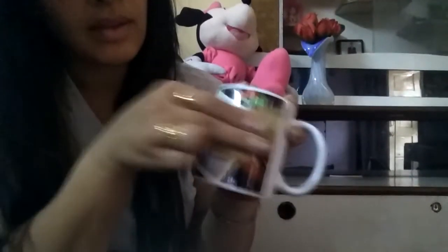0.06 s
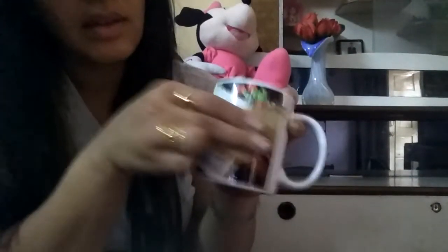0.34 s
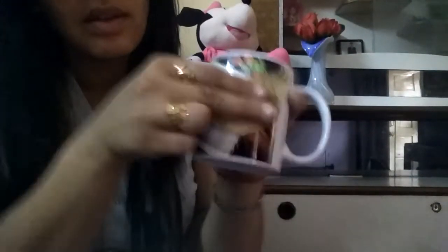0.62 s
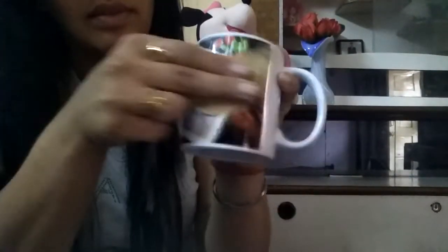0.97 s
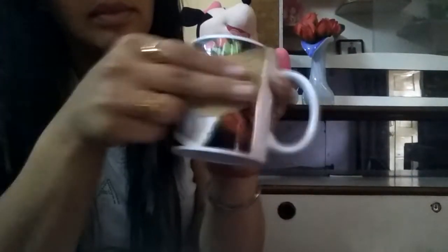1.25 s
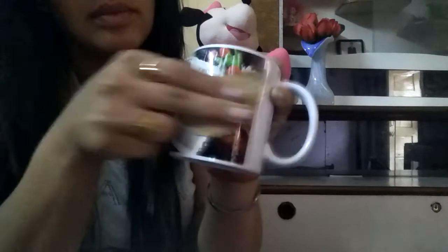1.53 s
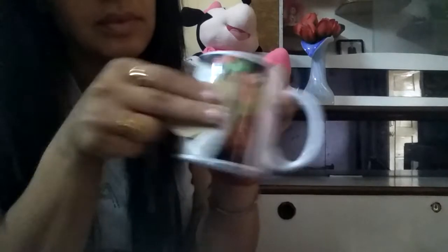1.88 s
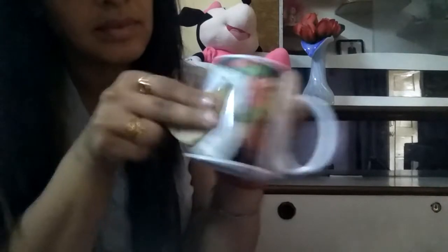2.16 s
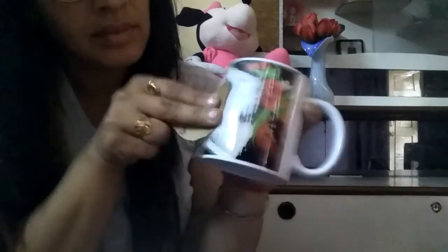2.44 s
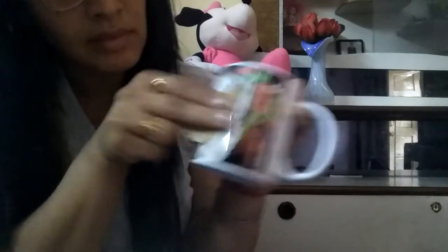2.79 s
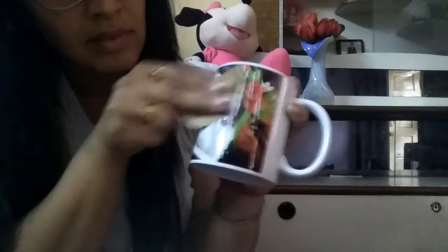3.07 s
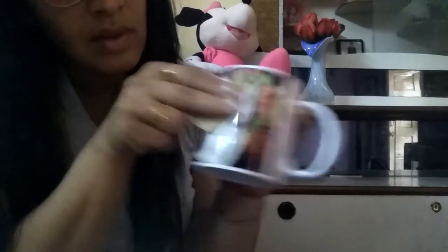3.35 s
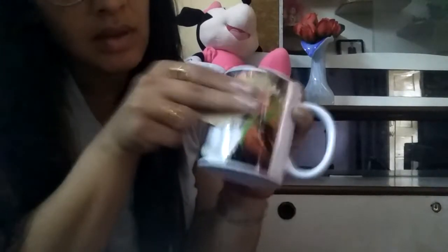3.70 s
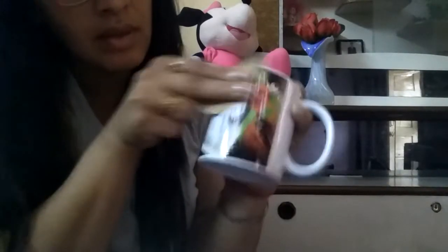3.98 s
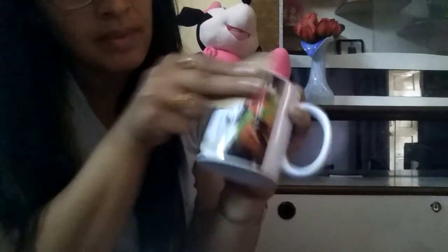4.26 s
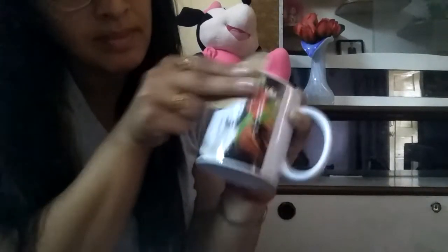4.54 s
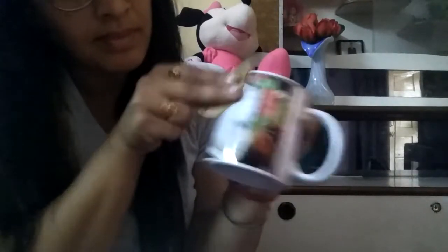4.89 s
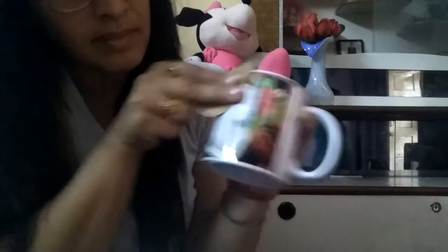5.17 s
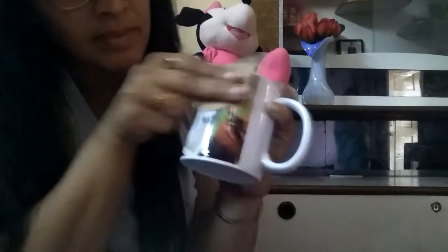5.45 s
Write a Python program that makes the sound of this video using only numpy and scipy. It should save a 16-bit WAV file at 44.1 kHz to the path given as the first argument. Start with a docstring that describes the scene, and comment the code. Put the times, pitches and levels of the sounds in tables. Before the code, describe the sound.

Sandpaper rubs quickly to and fro over a glazed mug, a bright, gritty hiss in short strokes, close by in a small room.

```python
"""A bright, gritty hiss comes in strokes, about seven a second: sandpaper rubbed to and fro over a glazed
mug, close by in a small room. A push drags lightly, then bites; the pull back is softer and more even.
Friction grows with the force of the stroke, so the force sets how loudly the grit hisses, the paper
buzzes and the hand-damped mug rings. The mug shifts in the grip, a low hum swells and fades,
single grains snap, and paper and fingers scuff."""
import sys
import numpy as np
from scipy import signal
from scipy.fft import rfft, irfft, next_fast_len
from scipy.io import wavfile
from scipy.ndimage import map_coordinates

SR = 44100
rng = np.random.default_rng(int(sys.argv[2]) if len(sys.argv) > 2 else 0)


def wav_out(sig):
    """Save sig, one row per channel (or a flat mono array), as 16-bit PCM at SR to the path in sys.argv[1]."""
    wavfile.write(sys.argv[1], SR, np.round(np.clip(np.atleast_2d(sig).T, -1, 1) * 32767).astype(np.int16))


N = 252693
TIME = np.arange(N) / SR

# strokes, push and pull in turn: start_s, wait_s, bite_s, strength_db, buzz_db, pitch_hz
HAND_STROKES = [(-0.06, 0.059, 0.031, -3.5, 4, 3490), (0.113, 0.037, 0.068, -11.5, 1.5, 3500),
                (0.267, 0.037, 0.04, -5.5, 4, 3370), (0.403, 0.032, 0.071, -7, -1.5, 3230),
                (0.555, 0.057, 0.031, -1.5, 3.5, 4000), (0.701, 0.033, 0.058, -7.5, -4.5, 3760),
                (0.856, 0.051, 0.041, -2.5, 3, 3770), (1.007, 0.037, 0.098, -7.5, -3, 3620),
                (1.154, 0.037, 0.052, 0.0, 0, 3930), (1.279, 0.046, 0.052, -4.5, -2, 3930),
                (1.429, 0.036, 0.043, -1, 0, 3950), (1.57, 0.014, 0.12, -21, 2.5, 3740),
                (1.753, 0.034, 0.047, -6, 3.5, 3900), (1.879, 0.041, 0.047, -3.5, -6.5, 3650),
                (2.028, 0.064, 0.024, -2, 0, 3680), (2.151, 0.045, 0.022, -1.5, -9, 3670),
                (2.279, 0.072, 0.02, -3.5, 2.5, 3740), (2.391, 0.014, 0.065, -13.5, -3, 3660),
                (2.527, 0.081, 0.023, -7.5, 1, 3700), (2.67, 0.048, 0.02, -14.5, 1, 3450),
                (2.794, 0.073, 0.025, -4.5, 4, 3850), (2.956, 0.029, 0.15, -18, 2, 3280),
                (3.11, 0.031, 0.049, -8, 5, 3580), (3.218, 0.049, 0.015, -1, -3, 4130),
                (3.348, 0.045, 0.048, -2.5, 2.5, 3700), (3.466, 0.014, 0.093, -11, -0.5, 4000),
                (3.602, 0.056, 0.049, -2.0, -3.5, 3530), (3.732, 0.07, 0.0067, 0.5, -6, 3450),
                (3.856, 0.075, 0.017, 4, 0, 3940), (3.993, 0.0052, 0.14, -20.0, 2.5, 3430),
                (4.154, 0.061, 0.042, -0.5, 0.5, 4050), (4.293, 0.017, 0.09, -10, -4.5, 3680),
                (4.433, 0.072, 0.028, 0.5, 4, 3390), (4.573, 0.01, 0.079, -14, -1.5, 3690),
                (4.719, 0.064, 0.03, -0.5, 6, 3800), (4.846, 0.023, 0.062, -9.0, -2.5, 3680),
                (4.997, 0.061, 0.049, -1.5, 3.5, 4160), (5.142, 0.014, 0.061, -7.5, -3, 4100),
                (5.281, 0.055, 0.034, 5, 4, 3810), (5.415, 0.022, 0.075, -16, 3, 4660),
                (5.599, 0.087, 0.022, -18, 8, 3850)]
# spectra of the rubbing, from highest to lowest: frequency_hz, gain_db
HISS_SPECTRUM = [(9000, -49), (11500, -39.5), (12150, 0.5), (13200, 4.5), (14300, 5.5), (15800, -4)]
SWISH_SPECTRUM = [(8000, -51), (9800, -7), (11000, 0.5), (12000, 3.5), (12800, -0.5), (14500, -12)]
SCRAPE_SPECTRUM = [(3800, -40), (5100, -2), (5900, -3.5), (7500, 0.5), (9300, 2.5), (10200, -11),
                   (12500, -24)]
BUZZ_SPECTRUM = [(1000, -40), (2500, -0.5), (3200, 5.5), (4400, 2.0), (5600, -7.0), (9000, -12)]
RASP_SPECTRUM = [(350, -13.5), (600, -8.5), (1000, -5), (1600, -6.5), (2200, 2.5), (2800, -3.5),
                 (4000, -24), (6000, -7)]
# slow trends of the rubbing; the rasp peaks while the paper works at the rim: time_s, gain_db
SWISH_TREND = [(0, 5), (1.2, 3.5), (2.4, -1), (2.9, -0.5), (3.15, -13), (3.4, 0.5), (3.7, -9), (4.3, -18),
               (4.6, -15), (4.8, 3), (4.92, -8), (5.08, 3.5), (5.2, 2), (5.35, -1), (5.7, -2)]
SCRAPE_TREND = [(0, 5.5), (1.2, 2), (2.4, 0.5), (2.9, 0.5), (3.15, -6), (3.4, -1.5), (3.8, -11.5),
                (4.25, 0), (4.6, 2), (5.35, -0.5), (5.7, -1)]
RASP_TREND = [(0, 0.5), (1.5, -1.5), (2.4, 4.5), (3.9, 1), (4.25, 7), (4.5, 10), (4.8, 10.5), (5.35, 4),
              (5.7, -11)]
# modes of the held mug: pitch_hz, width_hz, gain_db
MUG_MODES = [(721.6, 3.6, -6), (852, 18, 1), (1648, 200, -3), (2078, 220, -2), (2358, 127, -2),
             (3667, 20, 3), (5040, 150, -0.5), (5226, 59, 0.5)]
# envelopes of the mug shifting in the grip and of the hum: time_s, level_db
GRIP_ENVELOPE = [(0, -61), (.25, -58), (.55, -62), (.8, -59.5), (1.0, -61.5), (1.8, -66), (2.35, -63),
                 (2.7, -64), (3.2, -61), (3.45, -63), (3.67, -57), (3.85, -62), (4.8, -58), (5.05, -59),
                 (5.35, -61), (5.62, -73), (5.73, -55)]
HUM_ENVELOPE = [(0.0, -81), (0.16, -66), (0.29, -77), (0.46, -59), (0.65, -79), (0.88, -62), (1.8, -64.5),
                (1.93, -73), (3.35, -67), (3.81, -70), (3.85, -79), (3.94, -54.5), (4.05, -59.5),
                (4.1, -70), (4.44, -60.5), (4.47, -71), (4.6, -72), (4.64, -60.5), (5.09, -53), (5.41, -80),
                (5.49, -65), (5.73, -89)]
# spectra of the grip, the rumble and the steady room noise: frequency_hz, gain_db
GRIP_SPECTRUM = [(100, -19), (210, -19), (290, 1.5), (340, -6.5), (410, 1), (560, -15), (730, -0.5),
                 (1000, -1), (1400, -3), (2200, -26), (4000, -25.5)]
RUMBLE_SPECTRUM = [(25, -13), (55, -11), (80, 5.5), (120, -6.5), (200, -16), (500, -58), (2000, -76)]
AMBIENT_SPECTRUM = [(20, -18), (60, 8), (120, 5.5), (200, 1.5), (400, 0), (850, 1.5), (1600, 0.5),
                    (3000, -9.5), (8000, -24), (16000, -12)]
# reverberation time of the room: frequency_hz, t60_s
ROOM_DECAY = [(200, 1), (2000, 0.1), (6000, 0.45), (15000, 0.18)]
# coarse grains that catch and snap: start_s, peak_db
GRAIN_SNAPS = [(0.0947, -39), (0.5074, -31), (0.625, -26), (0.6284, -23), (1.1982, -9.5), (1.9974, -26),
               (2.1994, -10), (2.2374, -20), (2.6105, -14), (3.294, -8.5), (3.3972, -12), (3.5299, -20)]
# scuffs of paper and fingers, hollow or gritty: middle_s, length_s, pitch_hz, width_hz, level_db
BRIEF_SCUFFS = [(0.2, 0.079, 296, 70, -62.5), (0.351, 0.073, 393, 130, -63), (0.79, 0.17, 744, 110, -60),
                (1.273, 0.066, 1300, 111, -60), (1.289, 0.081, 292, 50, -64),
                (1.715, 0.067, 3220, 900, -57), (2.319, 0.06, 411, 48.7, -62),
                (2.391, 0.26, 1340, 243, -64.5), (2.77, 0.021, 2250, 795, -52),
                (3.189, 0.11, 410, 202, -65), (3.26, 0.057, 4080, 900, -48),
                (3.629, 0.068, 2200, 1000, -57), (3.677, 0.055, 438, 90, -61), (3.7, 0.043, 3790, 890, -43),
                (3.77, 0.053, 3540, 900, -53.5), (3.956, .022, 3870, 800, -45.5),
                (4.124, 0.04, 2230, 1680, -52.5), (4.224, 0.074, 1710, 300, -51),
                (4.418, 0.041, 2230, 614, -54), (4.469, 0.069, 2820, 2000, -48.5),
                (4.516, 0.078, 707, 158, -53.5), (4.537, 0.018, 3630, 1000, -43),
                (4.776, 0.076, 1710, 67.7, -52.5), (4.811, .025, 3570, 1100, -42),
                (4.82, 0.15, 873, 170, -57), (5.022, 0.13, 313, 80, -63), (5.065, 0.084, 747, 164, -57.5)]


def amp(db):
    """Amplitude ratio: tenfold for every 20 dB."""
    return 10 ** (np.asarray(db) / 20)


def unit(x):
    """Normalisation to rms 1."""
    return x / np.sqrt(np.mean(x ** 2) + 1e-20)


def level(curve):
    """Amplitude envelope, interpolated in decibels from rows of time_s, level_db."""
    return amp(np.interp(TIME, *np.transpose(curve)))


def read(points, hz):
    """Interpolation on a logarithmic frequency axis."""
    f, value = np.transpose(points)
    return np.interp(np.log(hz + 1), np.log(f + 1), value)


def add(mix, start_s, sound):
    """Superposition: a sound sums into the mix from start_s."""
    part = mix[max(round(start_s * SR), 0):][:len(sound)]
    part += sound[:len(part)]


def colour(x, spectrum):
    """Spectral shaping to rms 1, falling 12 dB an octave below the first point."""
    size = next_fast_len(N)
    hz = np.fft.rfftfreq(size, 1 / SR)
    gain = amp(read(spectrum, hz)) * np.minimum(hz / spectrum[0][0], 1) ** 2
    return unit(irfft(rfft(x, size) * gain, size)[:N])


def wander(rate_hz):
    """Random modulation of rms 1, gliding to a new value rate_hz times a second."""
    return unit(np.interp(TIME * rate_hz, np.arange(N), rng.standard_normal(N)))


def resonate(x, hz, width_hz):
    """Forced resonance: a damped oscillator of gain 1 whose natural frequency may move."""
    phasor = np.exp(2j * np.pi * np.cumsum(hz * np.ones(N)) / SR)
    pole = np.exp(-np.pi * width_hz / SR)
    return 2 * (phasor * signal.lfilter([1 - pole], [1, -pole], x / phasor + 1e-18)).real


def strokes():
    """Reciprocating motion, per sample: pulling or not, time into the stroke, its duration, its row."""
    starts, *columns = np.transpose(HAND_STROKES)
    k = np.maximum(np.searchsorted(starts, TIME) - 1, 0)
    duration = np.diff(starts, append=5.76)
    return k % 2 == 1, TIME - starts[k], duration[k], *(column[k] for column in columns)


def force(lag_s):
    """Sliding friction: a light drag that grows with speed, plus one bite a stroke."""
    pulling, t, duration, wait_s, bite_s, strength_db, *_ = strokes()
    speed = abs(np.sin(np.pi * t / duration))
    drag = amp(np.where(pulling, -10, -20.5)) * speed ** 0.77
    rise_s, fall_s = 0.004 + 0.066 * bite_s, 0.0055 + 0.066 * bite_s  # longer bites have gentler edges
    grips = (1 + np.tanh((t - lag_s - wait_s) / (2 * rise_s))) / 2
    holds = (1 + np.tanh((wait_s + bite_s + lag_s - t) / (2 * fall_s))) / 2
    turn_dip = np.tanh(0.99 + 4 * speed)  # friction eases where the hand turns
    pressed = amp(strength_db) * (drag + grips * holds) * turn_dip
    limit = amp(2.5)  # however hard the hand presses, the grit bites no deeper
    return limit * np.tanh(pressed / limit)


def friction(push_db, pull_db, exponent, lag_s=0.):
    """Power law: friction noise grows as a power of the force, with a gain for each direction."""
    pulling, *_ = strokes()
    return amp(np.where(pulling, pull_db, push_db)) * force(lag_s) ** exponent


def judder(rate_hz, depth_db):
    """Stick-slip: uneven contact modulates the amplitude at random."""
    return unit(amp(depth_db * 2 * np.tanh(wander(rate_hz) / 2)))


def grit(per_s, spread_db, share):
    """Shot noise: separate grain impacts carry a share of the power, countless fine ones the rest."""
    size = amp(spread_db * np.minimum(rng.exponential(1, N), 3.2))
    impacts = size * rng.choice([-1, 1], N) * (rng.random(N) < per_s / SR)
    return np.sqrt(share) * unit(impacts) + np.sqrt(1 - share) * rng.standard_normal(N)


def shifting_gap(x, depth_db, width_hz, span_s):
    """Time-varying filter: as the gap at the glaze changes shape, narrow peaks and hollows come and go."""
    hz, t, spectra = signal.stft(x, SR, nperseg=512, noverlap=384)
    where = np.meshgrid(hz / width_hz, t / span_s, indexing="ij")
    patches = map_coordinates(rng.standard_normal((400, 400)), where, order=1, mode="wrap")
    spectra *= amp(depth_db * unit(patches))
    return unit(signal.istft(spectra, SR, nperseg=512, noverlap=384)[1][:N])


def grit_hiss():
    """Friction noise: one stream of fine grains on glaze excites a hiss, a swish and a scrape."""
    fine = grit(per_s=3000, spread_db=0, share=0.24)
    fine = shifting_gap(fine, depth_db=2.5, width_hz=443, span_s=0.049)
    hiss = colour(fine, HISS_SPECTRUM) * friction(push_db=-21.5, pull_db=-22.5, exponent=1.2)
    swish = colour(fine, SWISH_SPECTRUM) * friction(push_db=-32, pull_db=-35, exponent=1.03, lag_s=0.001)
    scrape = colour(fine, SCRAPE_SPECTRUM)
    scrape *= friction(push_db=-44, pull_db=-46.5, exponent=0.89, lag_s=0.01)
    return hiss + swish * level(SWISH_TREND) + scrape * level(SCRAPE_TREND)


def paper_buzz():
    """Gliding resonance: the paper under the fingers rises in pitch on a push and falls on a pull."""
    pulling, t, _, wait_s, bite_s, _, buzz_db, pitch_hz = strokes()
    glide_hz_per_s = np.where(pulling, -5000, 8100)
    hz = (pitch_hz + glide_hz_per_s * (t - wait_s - bite_s / 2)) * (1 + 0.025 * wander(rate_hz=30))
    grains = grit(per_s=3000, spread_db=2.5, share=0.55)
    buzz = resonate(resonate(grains, hz, width_hz=1500), hz, width_hz=1560)
    buzz = shifting_gap(colour(buzz, BUZZ_SPECTRUM), depth_db=2.9, width_hz=170, span_s=0.045)
    # just before a push lets go, the paper catches and buzzes harder
    catch_s = wait_s + bite_s - 0.0032
    catch_db = np.where(pulling, 0, 3.5 * np.exp(-((t - catch_s) / 0.0046) ** 2))
    drive = friction(push_db=-44, pull_db=-44, exponent=0.96, lag_s=-0.00081)
    return buzz * amp(buzz_db + catch_db) * drive * judder(rate_hz=180, depth_db=1.5)


def coarse_rasp():
    """Impact noise: sparser, uneven grains rasp in the midrange, more so in strokes that buzz harder."""
    *_, buzz_db, _ = strokes()
    grains = colour(grit(per_s=1200, spread_db=6, share=0.31), RASP_SPECTRUM)
    rasp = shifting_gap(grains, depth_db=6, width_hz=182.3, span_s=0.05)
    drive = friction(push_db=-56.5, pull_db=-60.5, exponent=0.7, lag_s=-0.0095)
    return rasp * drive * level(RASP_TREND) * amp(0.75 * buzz_db)


def mug_ring():
    """Modal vibration: coarse grains drive the modes of the hand-damped mug."""
    drive = friction(push_db=0.5, pull_db=-2, exponent=0.64) * level(RASP_TREND) ** 0.82
    blows = grit(per_s=1500, spread_db=1.5, share=0.26) * drive
    return unit(sum(amp(db) * resonate(blows, hz, width_hz) for hz, width_hz, db in MUG_MODES))


def grip_creep():
    """Frictional creep: fingers slip on the mug in soft, dull grains."""
    slips = colour(grit(per_s=250, spread_db=1, share=0.55), GRIP_SPECTRUM)
    return level(GRIP_ENVELOPE) * shifting_gap(slips, depth_db=4, width_hz=120.5, span_s=0.07)


def low_hum():
    """Modulation: a low tone wavers in frequency, and swells and fades with the rumble around it."""
    pitch_hz = 78 + 1.714 * wander(rate_hz=7.7)
    tone = np.sqrt(2) * np.sin(2 * np.pi * np.cumsum(pitch_hz) / SR)
    rumble = colour(rng.standard_normal(N), RUMBLE_SPECTRUM)
    return level(HUM_ENVELOPE) * (amp(-1.2) * tone + amp(-5) * rumble)


def room_echo(x):
    """Reverberation: sparse reflections of random sign decay exponentially, the bass lasting longest."""
    taps = rng.choice([-1., 1.], SR // 2) * (rng.random(SR // 2) < 3000 / SR)
    taps[:130] = 0  # no reflection arrives in the first 3 ms
    hz, t, spectra = signal.stft(taps, SR, nperseg=256)
    decay = amp(-60 * t / read(ROOM_DECAY, hz)[:, None])
    tail = signal.istft(spectra * decay, SR, nperseg=256)[1]
    return signal.fftconvolve(x, tail / np.linalg.norm(tail))[:N]


def grain_snaps(band_hz=(11700, 15300), decay_s=0.0008):
    """Transients: a grain catches and snaps free in a brief burst of high noise."""
    out, t = np.zeros(N), np.arange(1024) / SR
    band = signal.butter(5, band_hz, "band", fs=SR, output="sos")
    for start_s, peak_db in GRAIN_SNAPS:
        burst = signal.sosfilt(band, rng.standard_normal(len(t)) * np.exp(-t / decay_s))
        add(out, start_s, amp(peak_db) * burst / abs(burst).max())
    return out


def scuffs():
    """Resonant filtering: each scuff is a small swell of friction noise in one band."""
    out = np.zeros(N)
    for middle_s, length_s, hz, width_hz, level_db in BRIEF_SCUFFS:
        band = signal.butter(2, [hz - width_hz / 2, hz + width_hz / 2], "band", fs=SR, output="sos")
        swell = np.hanning(round(length_s * SR))
        noise = signal.sosfilt(band, rng.standard_normal(SR // 2))[-len(swell):]
        add(out, middle_s - length_s / 2, amp(level_db) * unit(noise * swell))
    return out


def scene():
    """Superposition: the direct sound, its reverberation, the hum and steady room noise, in mono."""
    snaps = grain_snaps()
    contact = judder(rate_hz=600, depth_db=0.8) * judder(rate_hz=120, depth_db=1)
    sanding = contact * (grit_hiss() + paper_buzz() + coarse_rasp()) + amp(-58) * mug_ring()
    direct = sanding + snaps + amp(-1) * scuffs() + amp(-2) * grip_creep()
    echo = amp(-19) * room_echo(direct)
    background = low_hum() + amp(-68) * colour(rng.standard_normal(N), AMBIENT_SPECTRUM)
    return (direct + echo + background)[None]


def record(dry):
    """Band limiting: a linear-phase low-pass removes the treble above 15.9 kHz."""
    lowpass = signal.firwin(511, 15900, window=("kaiser", 9), fs=SR)
    return signal.oaconvolve(dry, lowpass[None], "same")


dry = scene()
out = record(dry)
wav_out(out)
```